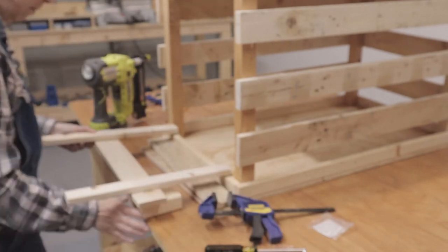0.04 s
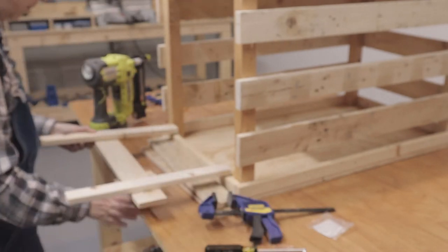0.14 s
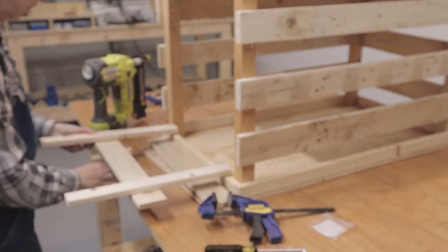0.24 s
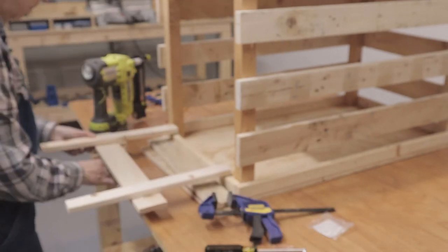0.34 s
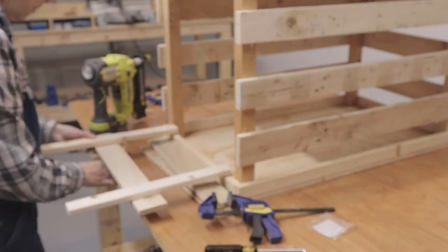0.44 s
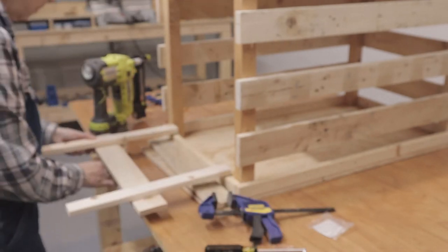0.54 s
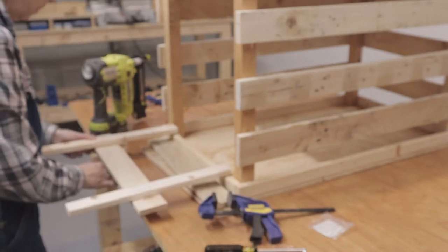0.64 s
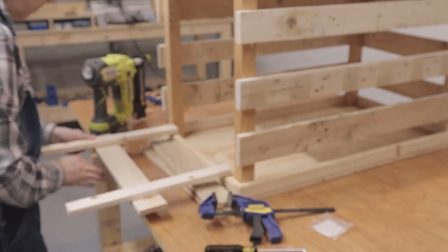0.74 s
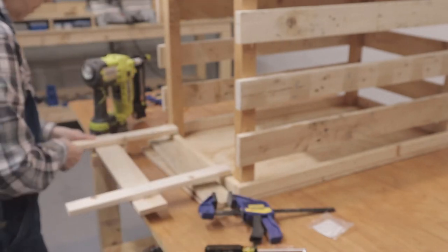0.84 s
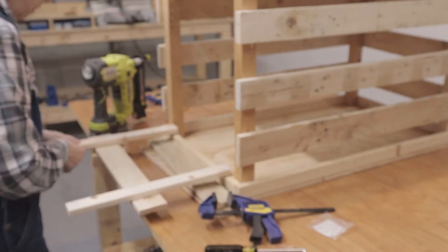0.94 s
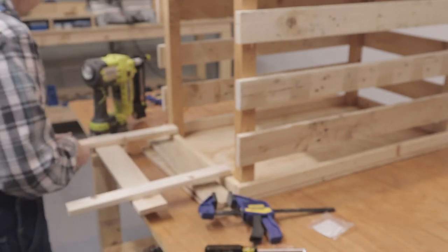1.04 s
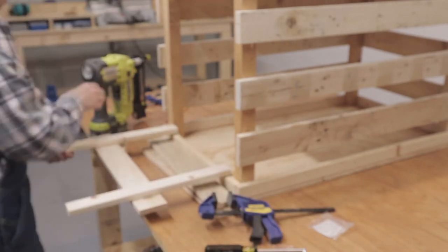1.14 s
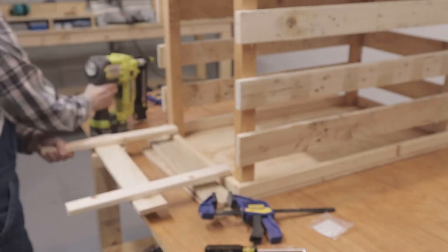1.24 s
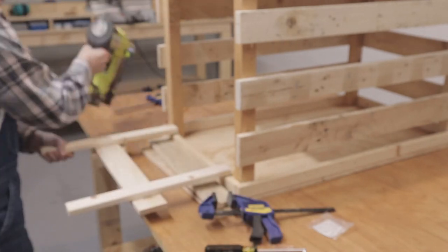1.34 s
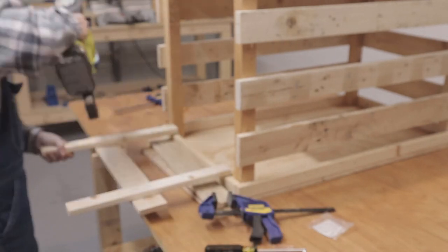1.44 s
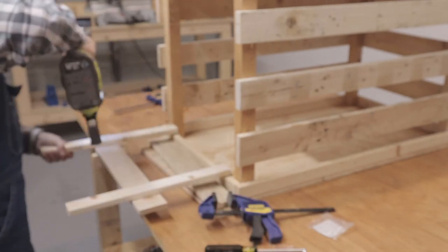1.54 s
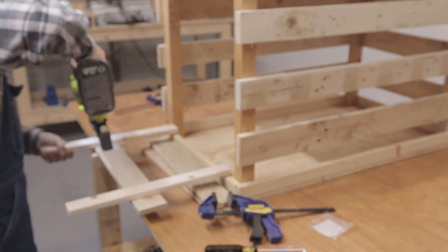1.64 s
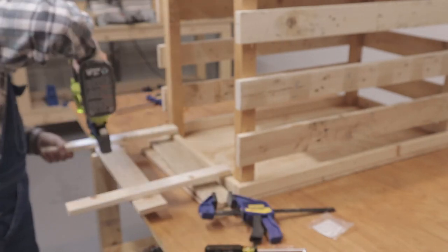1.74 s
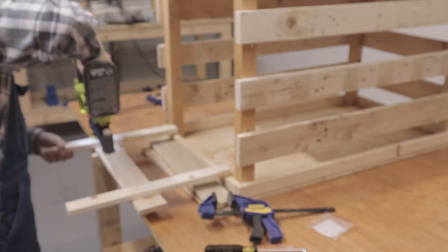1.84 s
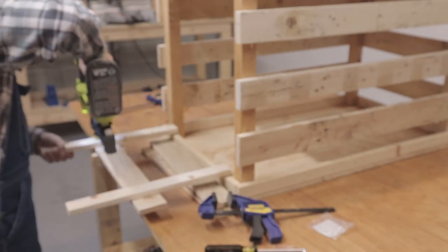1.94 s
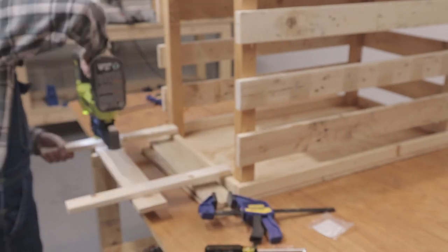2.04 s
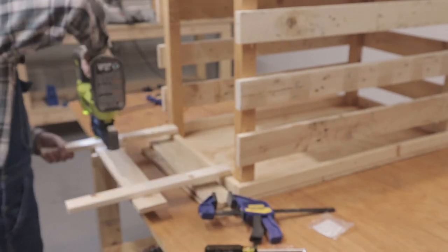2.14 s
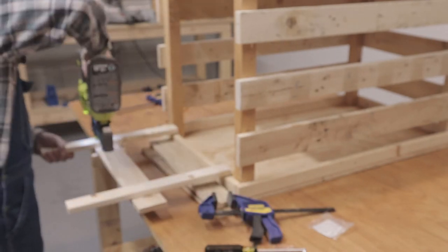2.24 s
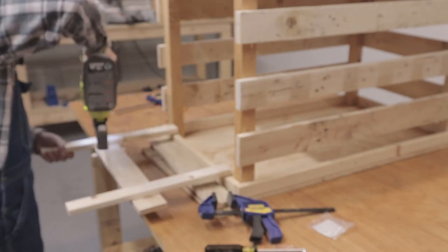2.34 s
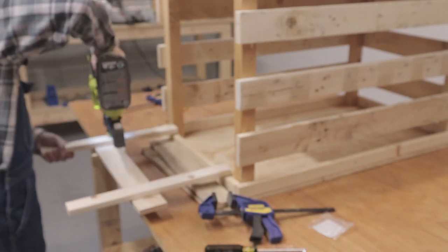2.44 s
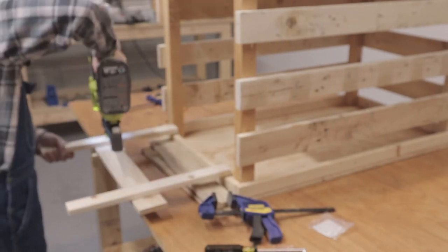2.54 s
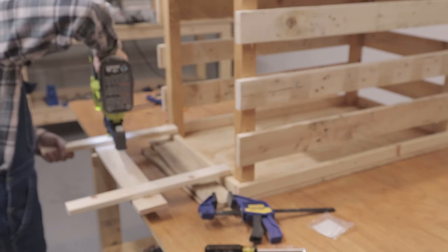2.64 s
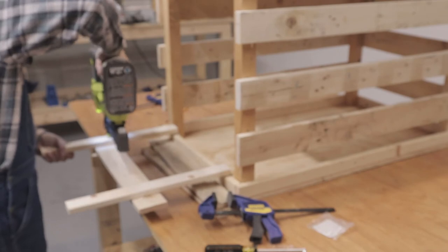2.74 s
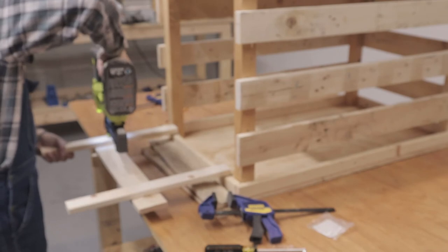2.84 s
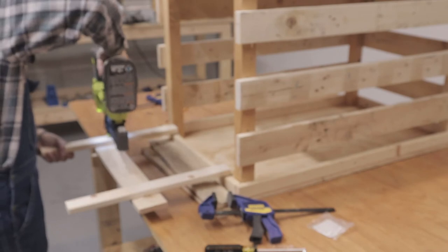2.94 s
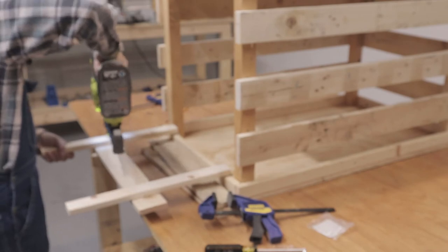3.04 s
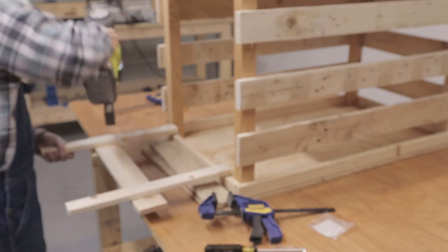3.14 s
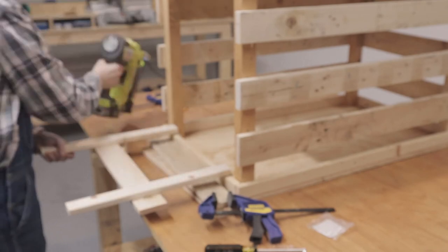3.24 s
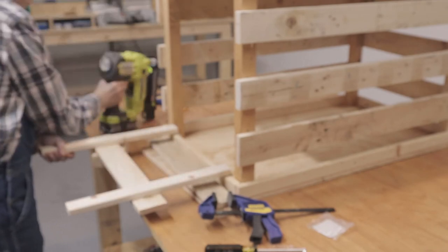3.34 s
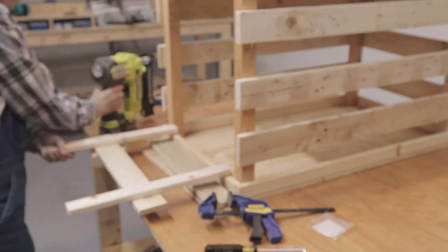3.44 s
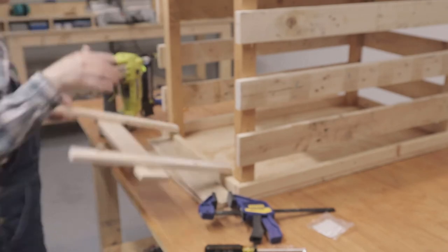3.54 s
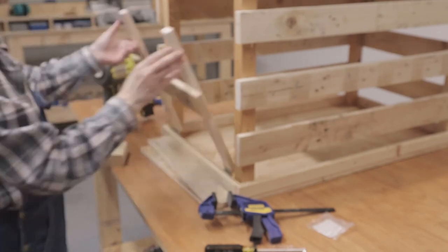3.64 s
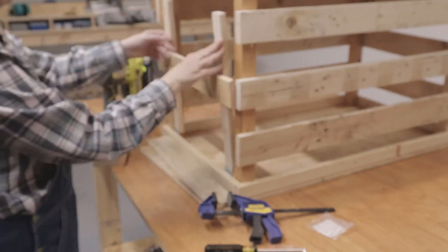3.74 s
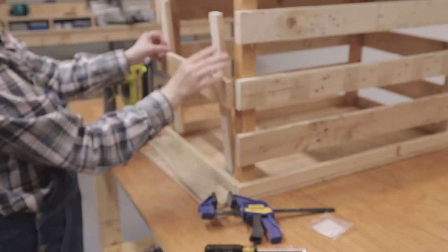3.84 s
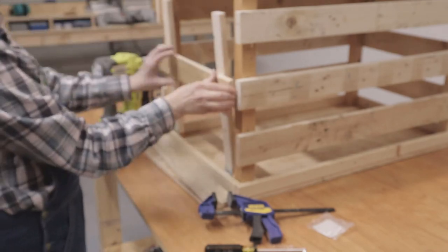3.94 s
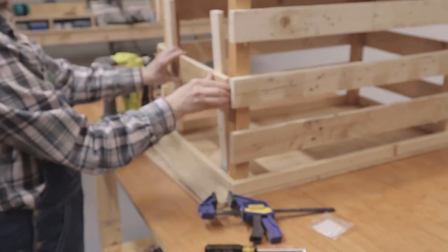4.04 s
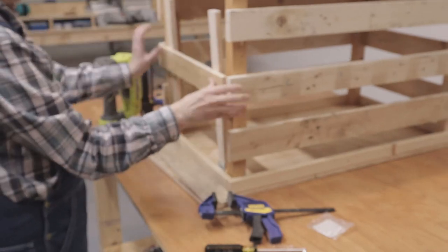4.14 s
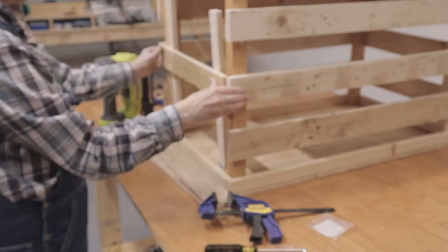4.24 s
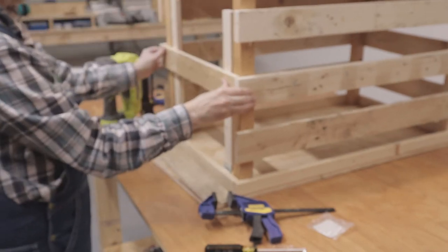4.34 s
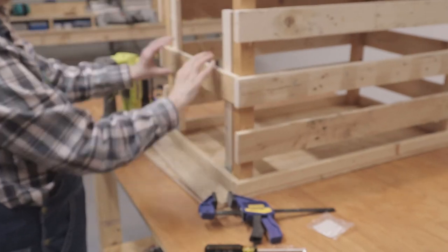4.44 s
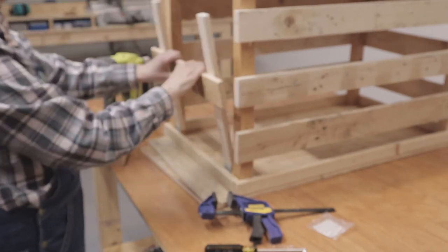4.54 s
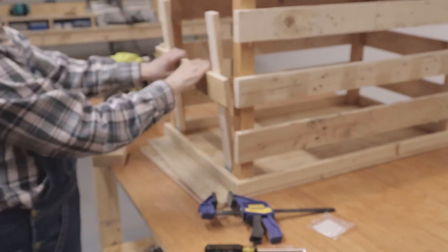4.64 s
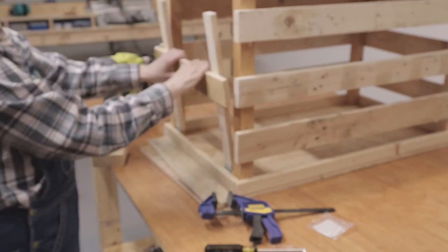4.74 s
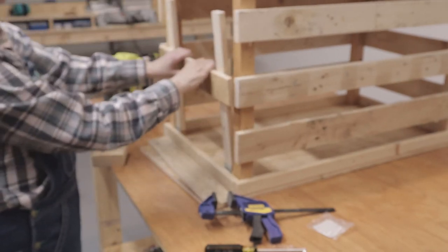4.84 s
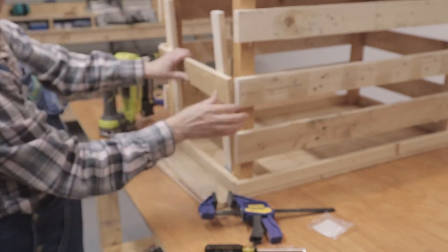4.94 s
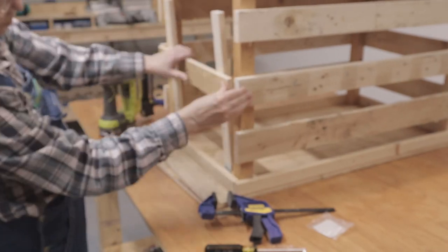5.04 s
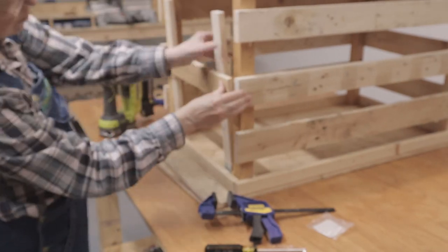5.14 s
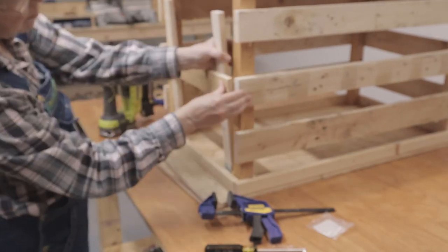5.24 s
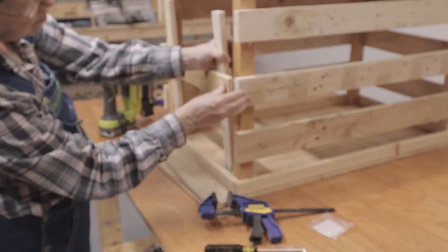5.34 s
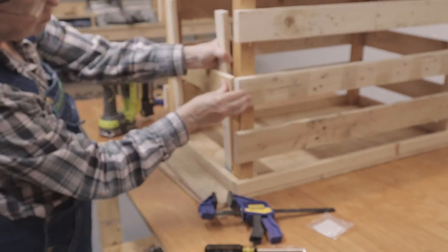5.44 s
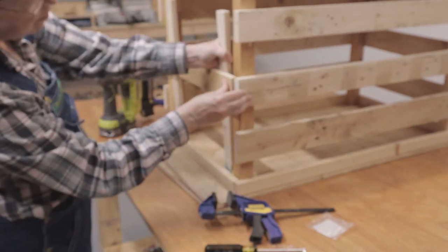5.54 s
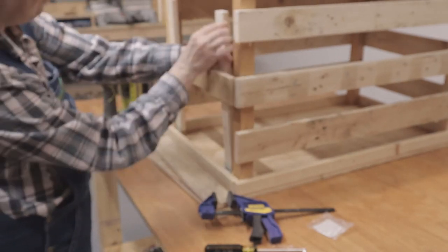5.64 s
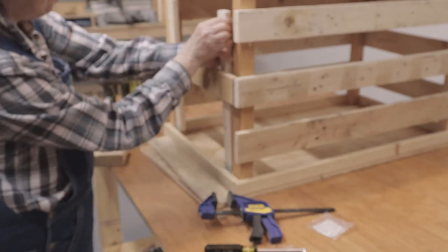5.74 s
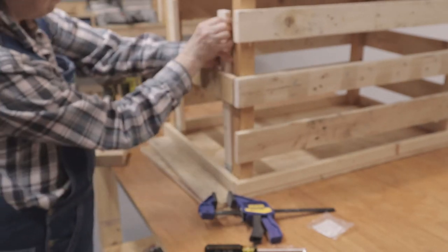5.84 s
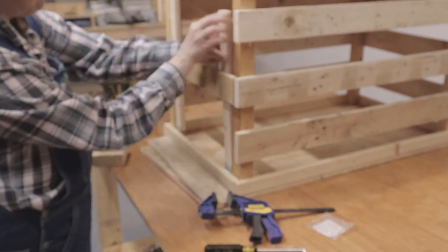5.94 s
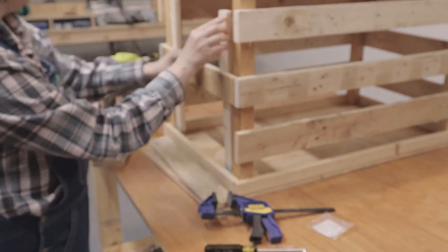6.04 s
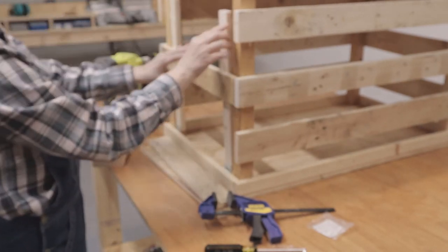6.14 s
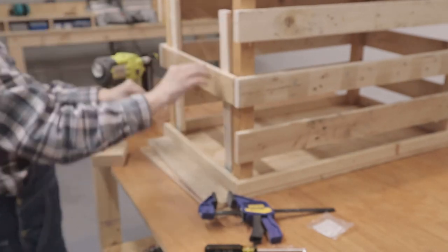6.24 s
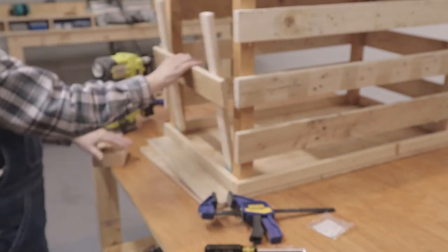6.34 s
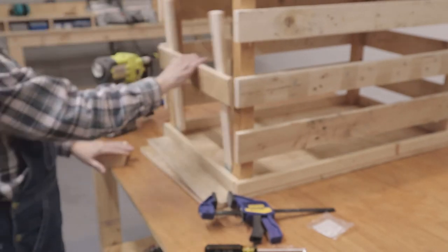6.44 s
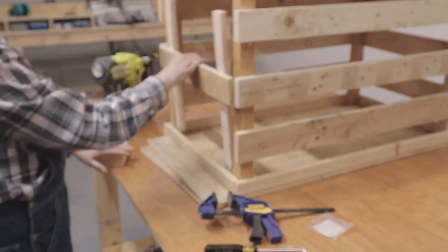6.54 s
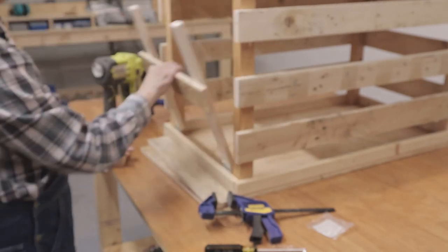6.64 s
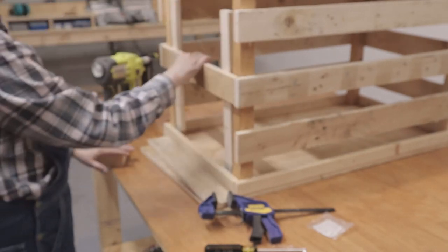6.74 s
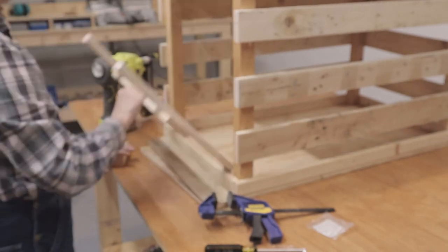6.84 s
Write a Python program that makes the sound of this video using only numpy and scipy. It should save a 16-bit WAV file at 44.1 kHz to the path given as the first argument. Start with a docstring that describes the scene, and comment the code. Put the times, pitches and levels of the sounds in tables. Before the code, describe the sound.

Close, dry workshop sound over very quiet ventilation and a faint hum. From 0.1 to 0.4 s a slat rasps roughly across the bench, swelling around 0.2-0.3. Faint rustles, tiny slides and dull knocks follow until a sharp bench knock at 1.3 as a nailer is picked up. After light contacts, it fires at 2.24 and again at 2.95: each a short rising motor and gear whirr, two hard steel cracks about 45 ms apart, shaken wood and a faint high spring ring, done in roughly a quarter second. A light knock falls at 2.78. At 3.3-3.4 the tool lands with two firm knocks. A slat bounces at 3.8, slides and taps at 4.1-4.3, then rattles rapidly from 4.55 to 4.9. Quiet handling and light taps near 5.7 lead to a flat clap at 5.95 and two louder, brighter claps at 6.5 and 6.73, with small slides and a hollow tick between.

```python
"""Crate work in a small workshop

A slatted wooden crate is worked on close to the microphone: noise rasps for each slide of wood, and
damped modes with noise clacks make slats bounce and clap. A cordless nailer, picked up and set down with
knocks on the bench, drives two nails with motor whine, gear noise and steel cracks. Sine hum, faint far
drones and ventilation noise lie beneath; the recorder's limiter ducks on loud peaks, then recovers."""
import sys
import numpy as np
from scipy import signal
from scipy.fft import rfft, irfft
from scipy.io import wavfile
from scipy.ndimage import uniform_filter1d, minimum_filter1d, map_coordinates

SR = 44100
rng = np.random.default_rng(int(sys.argv[2]) if len(sys.argv) > 2 else 0)


def transcribe(signal):
    """Save signal, clipped to [-1, 1], as a 16-bit WAV file at the path in sys.argv[1]."""
    frames = np.atleast_2d(signal).T
    limited = np.clip(frames, -1, 1)
    pcm = np.round(limited * 32767).astype(np.int16)
    wavfile.write(sys.argv[1], SR, pcm)


N = 303408
CLOCK = np.arange(N) / SR  # time through the scene [s]
AGE = np.arange(SR // 2) / SR  # time since a blow or stroke began [s]


def amp(db):
    """Decibels to gain."""
    return 10 ** (np.asarray(db) / 20)


def unit(x):
    """Scale to rms 1."""
    return x / np.sqrt(np.mean(x ** 2) + 1e-20)


def unit_hit(x):
    """Scale a hit to rms 1 over its first 20 ms."""
    return x / np.sqrt(np.mean(x[:SR // 50] ** 2) + 1e-20)


def along(points, hz):
    """Read (Hz, value) points on a log axis."""
    point_hz, value = np.transpose(points)
    return np.interp(np.log(hz + 1), np.log(point_hz), value)


def add(track, s, sound):
    """Mix a sound into a track from time s on, or from the start if s is negative."""
    part = track[max(round(s * SR), 0):][:len(sound)]
    part += sound[:len(part)]


def wobble(rate, t):
    """A smooth random curve with rate knots a second."""
    knots = rng.standard_normal(int(t[-1] * rate) + 4)
    return map_coordinates(knots, [t * rate])


def swell(t, centre, width):
    """A bell that reaches 1 at its centre."""
    return np.exp(-((t - centre) / width) ** 2)


def coloured(x, spectrum, tilt_db=0):
    """Give x a spectrum, tilted per octave in the treble; rms 1."""
    hz = np.fft.rfftfreq(len(x), 1 / SR)
    gain_db = along(spectrum, hz) + tilt_db * np.log2(1 + hz / 1000)
    return unit(irfft(rfft(x) * amp(gain_db), len(x)))


def noise(spectrum, tilt_db=0, ripple_db=0, rough_db=0):
    """Half a second of coloured noise; ripple_db favours some bands over others, rough_db makes it grainy."""
    grain_db = rough_db * (wobble(1500, AGE) + 0.47 * wobble(140, AGE))
    white = rfft(rng.standard_normal(len(AGE)) * amp(grain_db))
    favour = amp(ripple_db * wobble(90, np.linspace(0, 1, len(white))))
    return coloured(irfft(white * favour, len(AGE)), spectrum, tilt_db)


def dying(x, t60s):
    """Let each frequency of x die at its own speed."""
    hz, t, z = signal.stft(x, SR, nperseg=128)
    fade = amp(-60 * t / along(t60s, hz)[:, None])
    return signal.istft(z * fade, SR, nperseg=128)[1][:len(x)]


def ring(modes, scatter_db, grip_db=0):
    """Damped modes, struck at new strengths each time; a grip takes away grip_db more a second."""
    hz, db, t60 = np.transpose(modes)[:, :, None]
    level = db + scatter_db * rng.standard_normal(hz.shape)
    pitch = hz * (1 + .008 * rng.standard_normal(hz.shape))  # the support shifts from blow to blow
    phase = 2 * np.pi * (pitch * AGE + rng.random(hz.shape))
    return unit_hit(np.sum(amp(level - (60 / t60 + grip_db) * AGE) * np.sin(phase), axis=0))


FIRM_DB = -32  # a blow of ordinary force


def knocks(events, modes, spectrum, ring_db, clack_db, ring_loss, ring_gain, low_t60, high_t60,
           grip_db, chatter, crack, rise, attack, lowest_hz):
    """Wooden blows: a sharp crack, a clack held by chattering faces, and modes that ring less when bright."""
    # ring_loss: dB for each dB per octave of brightness; ring_gain: dB for each dB of force; times in s
    track = np.zeros(N)
    snap = np.exp(-AGE / .0018) * (1 - np.exp(-AGE / .0004))
    hold = 1 + 0.92 / (1 + (AGE / chatter) ** 6)
    contact = hold * (1 - np.exp(-AGE / rise)) + crack * snap
    for s, db, tilt_db in events:
        clack = dying(noise(spectrum, tilt_db, ripple_db=2.5), [(700, low_t60), (9000, high_t60)])
        rattle = amp(0.7 * wobble(550, AGE))  # the faces touch at several spots
        clack = unit_hit(clack * contact * rattle)
        body = ring(modes, 1.5, grip_db) * (1 - np.exp(-AGE / attack))
        body_db = ring_db - ring_loss * tilt_db + ring_gain * (db - FIRM_DB)
        add(track, s, amp(db) * (amp(clack_db) * clack + amp(body_db) * body))
    # the knocks have little bass
    return signal.sosfilt(signal.butter(2, lowest_hz, "highpass", fs=SR, output="sos"), track)


# machine hum: (frequency [Hz], mean level [dB rms])
HUM_TONES = [(120, -89), (240, -77.5), (959, -74.5)]
# faint far drones: (time when loudest [s], half length [s], frequency at that time [Hz],
# glide [octaves/s], mean level when loudest [dB rms])
FAR_DRONES = [(.9, 0.33, 145.2, -.85, -77.5), (4.4, 0.55, 283, 0, -70.5)]
# ventilation spectrum: (frequency [Hz], relative level [dB per Hz])
VENTILATION = [(25, -20.5), (60, -19.5), (90, -18.5), (130, -18), (165, -14.5), (230, -8), (300, -6.5),
               (480, -7.5), (700, -12.5), (1300, -16), (2200, -18), (6000, -22), (14000, -24.5),
               (16000, -31.5)]


def workshop():
    """Ventilation noise, a steady sine hum and far drones that come and go."""
    bed = np.zeros(N)
    for hz, db in HUM_TONES:
        bed += amp(db + 0.84 * wobble(0.82, CLOCK)) * unit(np.sin(2 * np.pi * hz * CLOCK))
    for s, width, hz, glide, db in FAR_DRONES:
        pitch = hz * 2 ** (glide * (CLOCK - s))
        tone = unit(np.sin(2 * np.pi * np.cumsum(pitch) / SR))
        bed += amp(db + 1.5 * wobble(3.3, CLOCK)) * swell(CLOCK, s, width) * tone
    air = coloured(rng.standard_normal(N), VENTILATION)
    return bed + amp(-67.0 + 0.16 * wobble(4.4, CLOCK)) * air


# treble between the knocks, room hiss included: (time [s], level before the rustle gain [dB])
TREBLE_LEVEL = [(0.5, -69), (0.66, -71), (1.39, -66.5), (1.62, -69), (2.17, -78), (2.6, -74.5), (3.36, -69),
                (3.47, -61.5), (4.23, -66), (4.57, -70.5), (4.68, -67.5), (5.63, -69.5), (6.2, -66),
                (6.42, -69), (6.56, -69.5), (6.88, -68.5)]
# sleeves and fingers on the work: (frequency [Hz], relative level [dB per Hz])
CLOTH_COLOUR = [(200, -29), (700, 4.5), (1500, 2.5), (3000, -4.5), (4300, -4.5), (4750, -4), (5400, -2.5),
                (8000, -7), (16000, -10)]
HISS_DB, RUSTLE_DB = -70, 4  # room hiss taken out of the treble; gain of the rustle left


def handling():
    """Cloth and fingertips rustle in clumps of tiny ticks: noise with a fast, uneven level."""
    ticks = rng.standard_normal(N) * amp(3.5 * wobble(300, CLOCK) + 2.8 * wobble(25, CLOCK))
    power = amp(np.interp(CLOCK, *np.transpose(TREBLE_LEVEL))) ** 2 - amp(HISS_DB) ** 2
    return amp(RUSTLE_DB) * np.sqrt(np.maximum(power, 0)) * coloured(ticks, CLOTH_COLOUR)


# a loose slat bouncing against the frame: (time [s], level [dB])
BOUNCES = [(.072, -48), (3.771, -34), (3.856, -43), (3.961, -53.5), (4.566, -44.5), (4.625, -34.5),
           (4.725, -34.5), (4.803, -36), (4.876, -38.5), (4.953, -61), (5.039, -57.5), (5.583, -60.5)]
# ringing of the slat: (frequency [Hz], relative level [dB], t60 before the grip [s])
SLAT_RING = [(267, -8.5, 0.1), (404, -2, 0.15), (471, 1.5, 0.17), (653, 9, .1), (721, 11, .13),
             (852, 5.5, 0.16), (1055, 0.5, 0.069), (1213, 2, .06), (1385, 16.5, 0.051), (1558, 14.5, 0.057),
             (1876, 8.5, 0.055), (2186, 4, 0.077)]
# its dense upper modes, heard as a clack: (frequency [Hz], relative level [dB per Hz])
SLAT_UPPER = [(100, -54), (400, -8.5), (800, 8), (1500, 5.5), (2100, 2.5), (2900, -6), (3800, -6.5),
              (5000, 0), (6300, -8), (7300, -3), (9000, -14.5), (16000, -22)]
BOUNCE_BRIGHTENS = 0.126  # dB per octave for each dB of force


def loose_slat():
    """A slat tips against the frame and bounces; the weaker the bounce, the duller it is."""
    bounces = [(s, db, BOUNCE_BRIGHTENS * (db - FIRM_DB)) for s, db in BOUNCES]
    return knocks(bounces, SLAT_RING, SLAT_UPPER, ring_db=4, clack_db=1.5, ring_loss=0.36, ring_gain=0,
                  low_t60=0.11, high_t60=0.048, grip_db=70, chatter=0.005, crack=0.061,
                  rise=0.0015, attack=0.0024, lowest_hz=234)


# a slat drawn across the bench: (time [s], level before the scrape gain [dB])
SCRAPE_STROKE = [(0.09, -43.5), (0.114, -55), (0.202, -35.5), (0.216, -39), (0.254, -37), (0.376, -50),
                 (0.41, -72)]
# wood rubbing on wood: (frequency [Hz], relative level [dB per Hz])
RUBBED_WOOD = [(120, -63), (200, -22), (340, -42), (440, -9.5), (569, -9.5), (696, 2), (916, -4),
               (1020, 0.5), (1400, -1.5), (1740, -4.5), (2860, -3), (6880, -7.5), (9400, -11.5),
               (13300, -11), (16000, -22.5)]
SCRAPE_DB, SCRAPE_BRIGHTENS = -1.5, 0.67  # gain; dB more of the bright rasp for each dB of the stroke
CATCH_DB, CATCH_HZ = 2.5, 70  # the fibres catch unevenly: depth and rate


def scrape():
    """One long stroke across the bench: rough noise that is brighter where the stroke is louder."""
    when, db = np.transpose(SCRAPE_STROKE)
    stroke_db = np.interp(when[0] + AGE, when, db, right=-120)
    dull = noise(RUBBED_WOOD, tilt_db=-1, ripple_db=3.5, rough_db=2.0)
    bright = noise(RUBBED_WOOD, tilt_db=2, ripple_db=0.5, rough_db=2.0)
    bright *= amp(SCRAPE_BRIGHTENS * (stroke_db - db.max()))
    rasp = unit((dull + bright) * amp(CATCH_DB * wobble(CATCH_HZ, AGE)))
    track = np.zeros(N)
    add(track, when[0], amp(SCRAPE_DB + stroke_db) * rasp)
    return track


# a held slat tapping the frame: (time [s], level [dB], brightness [dB per octave])
HELD_TAPS = [(.143, -46.5, 3.5), (4.296, -30, -2), (4.546, -36, 4), (5.637, -46.5, 2.5), (5.677, -43.5, 8),
             (5.717, -39.5, 1.5), (6.215, -52, 0)]
# a slat clapped flat onto the frame: (time [s], level [dB], brightness [dB per octave],
# lead of the edge that lands first [s], time until the rebound [s])
FLAT_CLAPS = [(5.946, -23.5, .5, 0.022, .062), (6.494, -19, 3.5, .007, .081),
              (6.732, -17.5, 3.5, .006, .077)]
# ringing of the frame: (frequency [Hz], relative level [dB], t60 before the grip [s])
FRAME_RING = [(282.4, -26.5, 0.22), (508, -24, 0.37), (650, -4, 0.14), (706, 1, 0.056), (835.6, 3.5, 0.069),
              (1043, -5, 0.093), (1358, -3.5, 0.097), (1417, -5.5, 0.079), (1614, 4, 0.053),
              (1784, 4, 0.045), (1907, -6.5, 0.09), (2120, -7, 0.11), (2517, -6.5, 0.091)]
# its dense upper modes, heard as a clack: (frequency [Hz], relative level [dB per Hz])
FRAME_UPPER = [(60, -33), (350, -13), (650, 3), (1500, 5), (3000, -0.5), (5000, 1.5), (8000, -5),
               (10500, -8.5), (16000, -18)]
# against the clap itself: level [dB], and brightness lost [dB per octave]
EDGE_DB, EDGE_DULLER_DB = -14, 1.5
REBOUND_DB, REBOUND_DULLER_DB = -21.5, 1


def frame():
    """Slats tap the frame or meet it face to face: one edge, the bright clap, then a light rebound."""
    blows = list(HELD_TAPS)
    for s, db, tilt_db, lead, flight in FLAT_CLAPS:
        blows.append((s - lead, db + EDGE_DB, tilt_db - EDGE_DULLER_DB))
        blows.append((s, db, tilt_db))
        blows.append((s + flight, db + REBOUND_DB, tilt_db - REBOUND_DULLER_DB))
    return knocks(blows, FRAME_RING, FRAME_UPPER, ring_db=-2.5, clack_db=-3.5, ring_loss=1.38, ring_gain=.1,
                  low_t60=0.17, high_t60=0.079, grip_db=40.0, chatter=0.012, crack=0.53,
                  rise=.001, attack=0.0052, lowest_hz=90)


# short slides of wood on wood: (time of the fastest moment [s], rise [s], level [dB],
# brightness [dB per octave]); a time under 0.25 s is heard at 0.25 s
SHORT_SLIDES = [(.082, 0.009, -51, 2.5), (.455, .007, -56, -1.5), (.744, 0.028, -59, 1),
                (1.066, .02, -55, 3), (1.113, .009, -49, 3), (2.77, 0.03, -54, -3),
                (3.515, 0.011, -52.5, 5), (4.09, .02, -36, 2), (4.168, 0.0068, -51, 5),
                (4.295, 0.0076, -34.5, 2.5), (4.335, 0.023, -39.5, -.5), (4.42, 0.0076, -55, 0),
                (4.553, .0085, -39, 3.5), (6.143, 0.0079, -53.5, 3), (6.327, .005, -55, 3.5),
                (6.366, 0.012, -42, 0.5), (6.589, 0.0097, -44, 0.5), (6.824, .007, -44, 0)]
SLIDE_FALL = 0.96  # slowing down takes this share of the rise


def slides():
    """Wood fibres catch and slip: grainy noise that swells with the speed of each stroke."""
    track = np.zeros(N)
    t = AGE - AGE.mean()  # the fastest moment is at the middle
    for s, rise, db, tilt_db in SHORT_SLIDES:
        width = np.where(t < 0, rise, SLIDE_FALL * rise)
        speed = np.exp(1 - np.sqrt(1 + 2 * (t / width) ** 2))
        rasp = noise(RUBBED_WOOD, tilt_db, ripple_db=1.5, rough_db=1.5)
        add(track, s - AGE.mean(), amp(db) * speed * rasp)
    return track


# knocks on the workbench: (time [s], level [dB], brightness [dB per octave])
WORKBENCH_KNOCKS = [(.483, -55.5, -6.5), (.55, -57, -1), (.566, -61, -7), (.857, -63, -7), (1.31, -21, 0.5),
                    (1.842, -59.5, -4.5), (1.959, -58, -1), (2.014, -54, -1.5), (2.052, -52.5, -3),
                    (2.778, -39.5, -1), (3.317, -22.5, .5), (3.38, -23.5, -1.5), (3.445, -42, -6)]
# ringing of the bench: (frequency [Hz], relative level [dB], t60 before the grip [s])
BENCH_RING = [(256, -14.5, .09), (352, -13, 0.044), (428, -7.5, 0.16), (484, -1.5, 0.099), (654, 0.5, 0.1),
              (661, -4.5, 0.1), (725, 0.5, 0.049), (820, -11.5, 0.16), (955, -0.5, 0.039), (1007, -7, 0.1),
              (1284, -0.5, 0.073), (1392, -2, 0.051), (1465, -4, 0.046), (1650, -4.5, 0.065),
              (1905, -3, .05), (2124, -11, 0.06), (2500, -6, 0.06)]
# its dense upper modes, heard as a clack: (frequency [Hz], relative level [dB per Hz])
BENCH_UPPER = [(60, -22.5), (200, -14), (340, 1), (480, 1), (1400, -0.5), (2200, -1), (3200, -2.5),
               (5000, 0), (7000, -4), (10000, -10.5), (16000, -21)]


def bench():
    """Tool and wood knock on the heavy bench top: a strong crack, then a quickly damped ring."""
    return knocks(WORKBENCH_KNOCKS, BENCH_RING, BENCH_UPPER, ring_db=1.5, clack_db=-1, ring_loss=.45,
                  ring_gain=0, low_t60=0.13, high_t60=0.071, grip_db=107.5, chatter=0.0088, crack=7.2,
                  rise=0.004, attack=0.0032, lowest_hz=189.3)


# steel parts struck: (frequency [Hz], relative level [dB per Hz])
STEEL_COLOUR = [(30, -5), (200, -11), (600, -3.5), (1700, 7), (3000, -1.5), (5000, 3.5), (8000, 5.5),
                (16000, -1.5)]


def strike(db, t60, tilt_db, recoil_db):
    """A blow inside the nailer: a steel crack and the low push of its recoil."""
    crack = noise(STEEL_COLOUR, tilt_db) * amp(-60 * AGE / t60) * (1 - np.exp(-AGE / 0.0003))
    u = AGE / 0.0015
    return amp(db) * crack + amp(recoil_db) * (1 - u) * np.exp(-u)


# nailer trigger pulls: (time [s], gain [dB])
TRIGGER_PULLS = [(2.2367, -0.5), (2.9459, -0.5)]
# impacts in one cycle: (time after the trigger [s], level before the pull's gain [dB], t60 [s],
# tilt [dB per octave], recoil before the pull's gain [dB])
CYCLE_STRIKES = [(0, -23, .012, 12, -57.5), (.063, -6.5, 0.02, 1, -26), (.107, -4, 0.02, 2.5, -27)]
# motor speed in one cycle: (time after the trigger [s], mean gear mesh frequency [Hz])
MOTOR_SPEED = [(.008, 3600), (.022, 9980), (.036, 12440), (.046, 11630), (.060, 6324), (.080, 4456),
               (.102, 5200), (.128, 7100), (.19, 3500)]
# gear noise: (frequency [Hz], relative level [dB per Hz])
GEAR_COLOUR = [(150, -52), (500, -27), (780, -17.5), (940, -26.5), (1200, -12), (1450, -15), (1880, -4.5),
               (2400, -8), (3300, -8), (4700, 1), (6200, -1), (9500, -2.5), (14800, 0), (16500, -15)]
# wood shaken by the nail: (frequency [Hz], relative level [dB per Hz])
SHAKEN_WOOD = [(100, -31), (400, -5.5), (650, 2), (1300, -5), (4000, -18.5)]
# singing spring of the tool: (frequency [Hz], relative level [dB], t60 [s])
SPRING_RING = [(2900, -10.5, 0.68), (5200, -11.5, .7), (7550, -8.5, .6), (7760, -2, 1), (7860, -4, 1),
               (7960, -5.5, .9)]
SPIN_UP_S, POWER_OFF_S = .0095, 0.14  # after the trigger
SPIN_UP_DB_PER_S, COAST_DB_PER_S = 3602, 850.5
# gear noise at top speed, its growth with speed; the free whine
GEAR_DB, GEAR_DB_PER_OCTAVE, WHINE_DB = -24, 2.5, -30.5
STRAIN_LEAD_S, STRAIN_S = .009, .008  # the strain peaks this long before an impact; its half length
STRAIN_GEAR_DB, STRAIN_WHINE_DB = 5, 14.5  # what the full strain adds


def nailer():
    """The motor spins up, labours against the air piston, fires the nail and runs on to its stop."""
    track = np.zeros(N)
    mesh_hz = np.interp(AGE, *np.transpose(MOTOR_SPEED))
    power_db = -SPIN_UP_DB_PER_S * np.maximum(SPIN_UP_S - AGE, 0)
    power_db -= COAST_DB_PER_S * np.maximum(AGE - POWER_OFF_S, 0)
    compressing, returning = [swell(AGE, blow[0] - STRAIN_LEAD_S, STRAIN_S) for blow in CYCLE_STRIKES[1:]]
    gear_db = power_db + GEAR_DB + GEAR_DB_PER_OCTAVE * np.log2(mesh_hz / mesh_hz.max())
    gear_db += STRAIN_GEAR_DB * (compressing + .4 * returning)
    whine_db = power_db + WHINE_DB + STRAIN_WHINE_DB * compressing
    for s, db in TRIGGER_PULLS:
        turn = 2 * np.pi * np.cumsum(mesh_hz * (1 + 0.022 * wobble(890, AGE))) / SR
        whine = np.sin(turn) + 0.41 * np.sin(1.25 * turn)  # two gear stages
        gears = noise(GEAR_COLOUR, ripple_db=2.1) * amp(2.0 * wobble(700, AGE))
        add(track, s, amp(db + gear_db) * gears + amp(db + whine_db) * whine)
        for delay, *blow in CYCLE_STRIKES:
            add(track, s + delay, amp(db) * strike(*blow))
        # the nail shakes the wood and leaves the tool's spring singing
        wood = amp(-27) * unit_hit(noise(SHAKEN_WOOD) * amp(-60 * AGE / 0.23))
        spring = amp(-58) * ring(SPRING_RING, 2) * amp(3 * wobble(90, AGE))
        add(track, s + CYCLE_STRIKES[1][0], amp(db) * (wood + spring))
    return track


# sleeve swishes over the work: (time [s], half length [s], level [dB])
SLEEVE_SWISHES = [(3.66, .08, -64.5), (5.263, 0.089, -67)]
# their colour: (frequency [Hz], relative level [dB per Hz])
SQUEAK_COLOUR = [(1000, -45), (4200, -22), (4600, 0.5), (5000, -5), (5600, -15), (16000, -41)]


def squeaks():
    """A sleeve swishes over the work in faint high flecks of narrow, unsteady noise."""
    drag = sum(amp(db) * swell(CLOCK, s, width) for s, width, db in SLEEVE_SWISHES)
    flecks = rng.standard_normal(N) * amp(6 * wobble(60, CLOCK))
    return drag * coloured(flecks, SQUEAK_COLOUR)


THUD_DB, THUD_GROWS = -42.5, 4.7  # peak at the hardest clap; dB less for each dB weaker


def thuds():
    """A hard clap pushes the whole crate against the bench: one low pressure pulse."""
    track = np.zeros(N)
    hardest = max(clap[1] for clap in FLAT_CLAPS)
    u = AGE / 0.002
    for s, db, *_ in FLAT_CLAPS:
        add(track, s, amp(THUD_DB + THUD_GROWS * (db - hardest)) * (1 - u) * np.exp(-u))
    return track


# ringing of a small hard piece: (frequency [Hz], relative level [dB], t60 [s])
TAP_RING = [(1000, 0, 0.087), (1630, 2, 0.047), (2300, 3, .04), (2750, -3, 0.037), (3040, 3, 0.032),
            (3600, -9, .035), (3930, -9, .03)]
# its clack: (frequency [Hz], relative level [dB per Hz])
TAP_UPPER = [(150, -23), (600, 3), (1100, 3), (3300, -3), (4300, -15), (6000, -30), (16000, -38)]


def tap():
    """A small hard piece gives one hollow tick of damped modes and a short clack."""
    track = np.zeros(N)
    clack = unit_hit(noise(TAP_UPPER, ripple_db=2) * amp(-60 * AGE / 0.08))
    tick = amp(-45.5) * ring(TAP_RING, 1.5) + amp(-46) * clack
    add(track, 6.411, tick * (1 - np.exp(-AGE / .0012)))
    return track


# decay of the room: (frequency [Hz], t60 [s])
ROOM_DECAY = [(150, 0.27), (900, 0.28), (3000, 0.14), (12000, 0.15)]


def room(x):
    """The short answer of a cluttered room: a noise tail that dies at its own speed in each band."""
    tail = dying(rng.standard_normal(len(AGE)), ROOM_DECAY) * (1 - np.exp(-AGE / 0.0081))
    return signal.fftconvolve(x, tail / np.linalg.norm(tail))[:N]


def scene():
    """All the work, close to the microphone, with a weak room answer over the workshop's hum."""
    wood = handling() + loose_slat() + scrape() + frame() + slides() + bench() + squeaks() + thuds() + tap()
    tool = nailer()
    answer = room(amp(-32.5) * wood + amp(-36.5) * tool)
    return (wood + tool + answer + workshop())[None]


def limiter(x, ceiling_db, release_db):
    """Peaks above the ceiling pull the gain down, from 1.5 ms ahead; it recovers by release_db a second."""
    over = np.maximum(20 * np.log10(np.abs(x) + 1e-9) - ceiling_db, 0)
    cut = np.maximum.accumulate(over + release_db * CLOCK, axis=-1) - release_db * CLOCK
    return x * uniform_filter1d(minimum_filter1d(amp(-cut), size=65), size=65)


TOP_HZ = 16400  # highest frequency in the scene [Hz]


def record(dry):
    """Peaks are limited; nothing sounds above TOP_HZ."""
    held = limiter(dry, ceiling_db=-8, release_db=20.5)
    return irfft(rfft(held) * (np.fft.rfftfreq(N, 1 / SR) < TOP_HZ), N)


dry = scene()
out = record(dry)
transcribe(out)
```